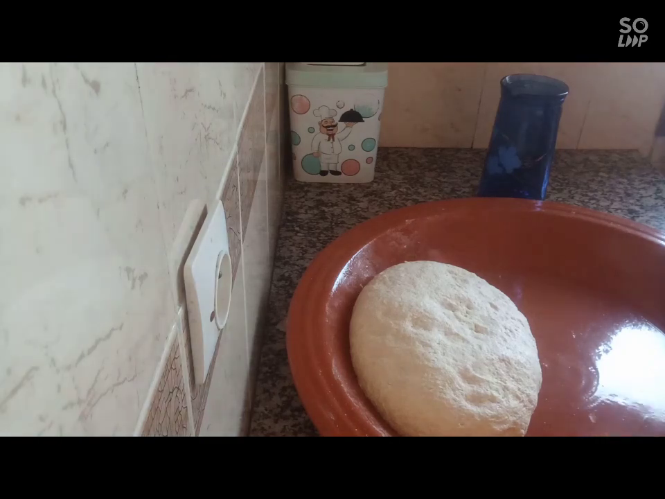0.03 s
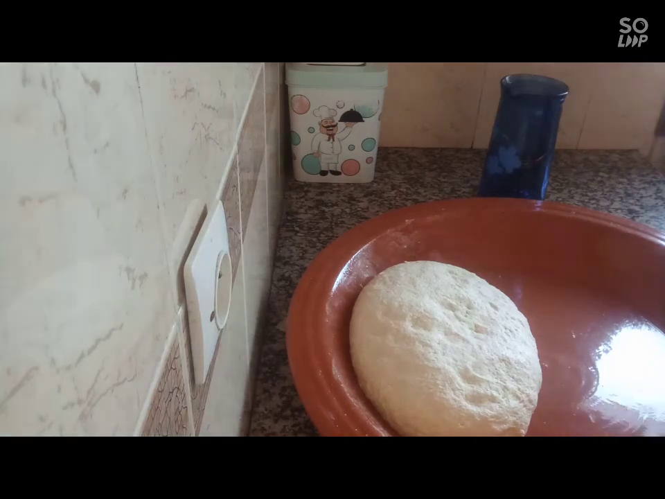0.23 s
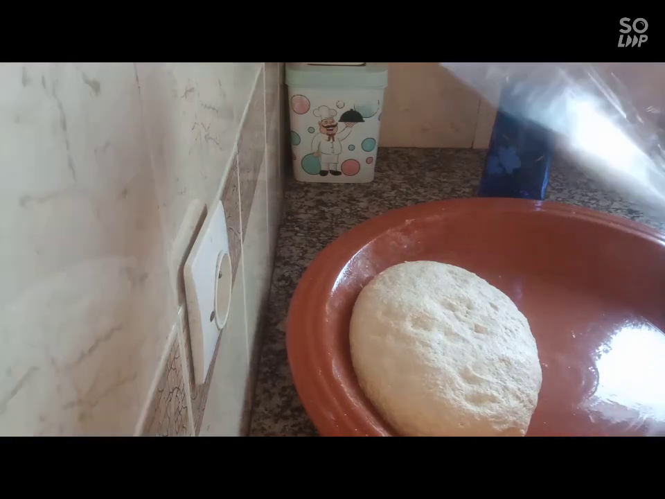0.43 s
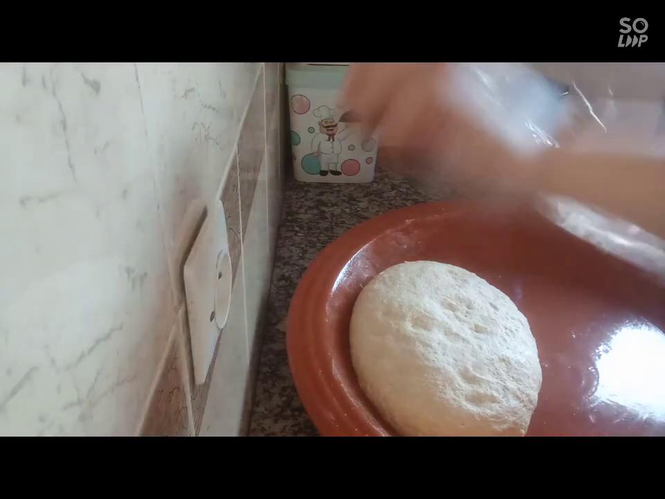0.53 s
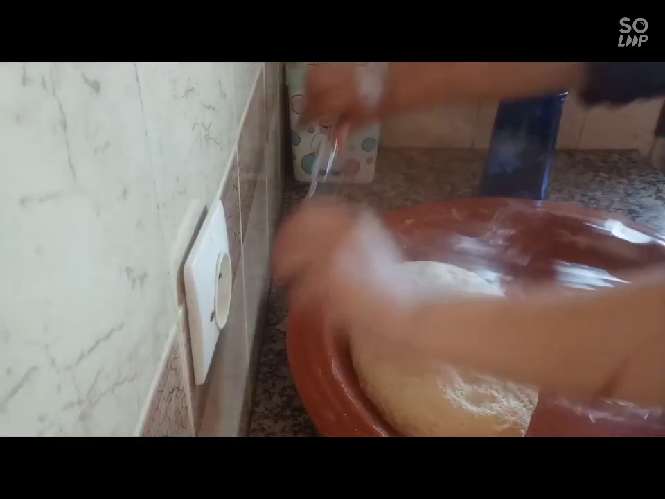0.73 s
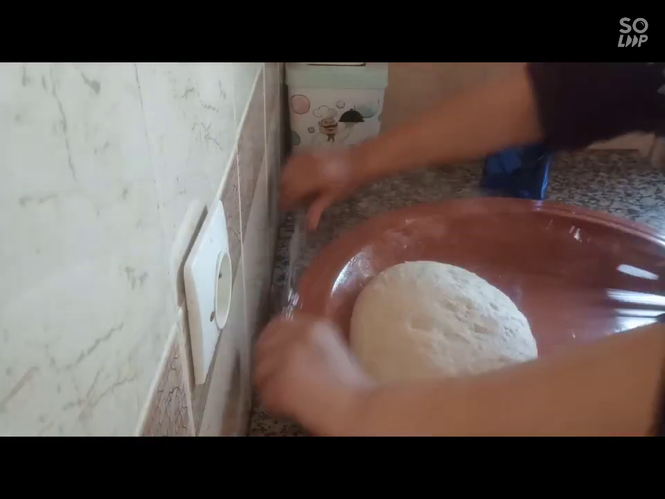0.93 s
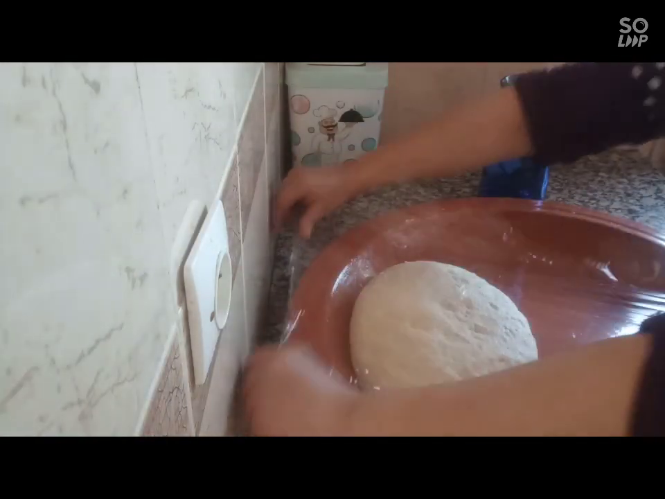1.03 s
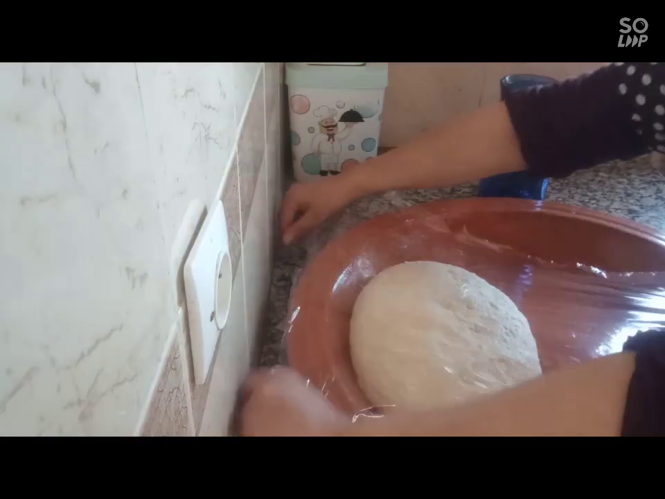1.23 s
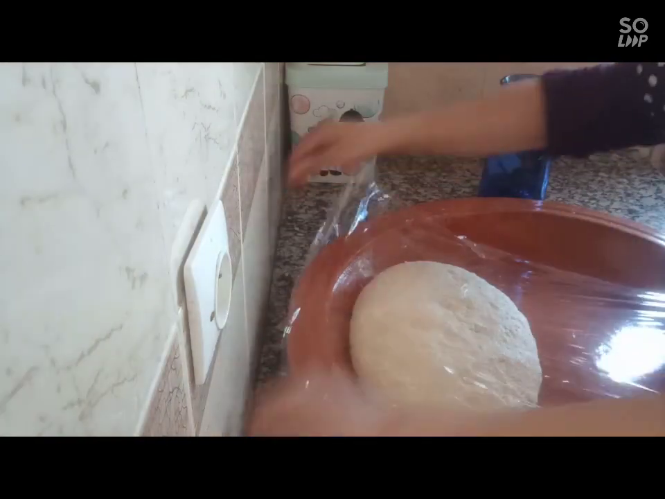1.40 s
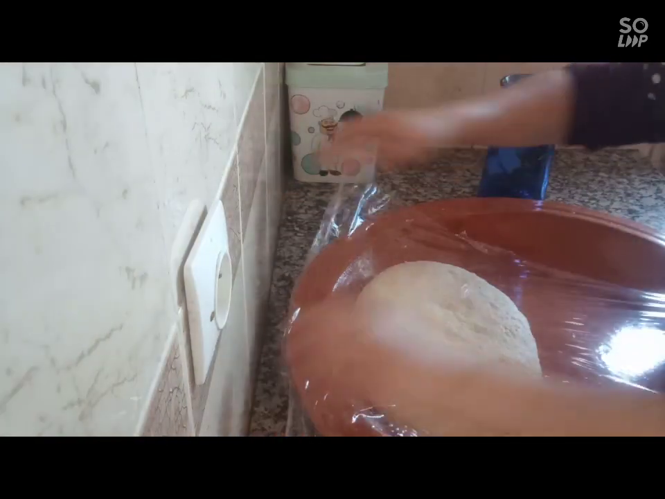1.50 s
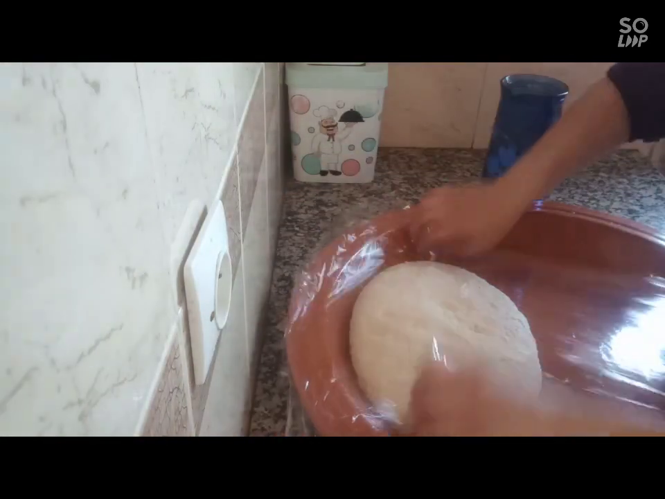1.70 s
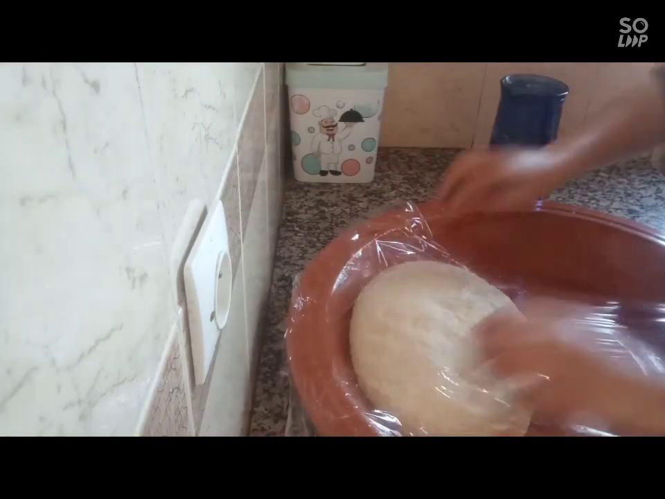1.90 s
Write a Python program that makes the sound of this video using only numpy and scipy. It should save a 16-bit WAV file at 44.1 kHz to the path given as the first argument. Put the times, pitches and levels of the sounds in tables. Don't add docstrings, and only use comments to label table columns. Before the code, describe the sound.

In a tiled home kitchen, a cabinet door rumbles and thuds, then plastic wrap is tugged, rustled and snapped over a dish, a hand knocks the clay, and another tug starts; heard nearby on a phone.

```python
import sys
import numpy as np
from scipy import signal
from scipy.fft import rfft, irfft, next_fast_len
from scipy.io import wavfile
from scipy.ndimage import map_coordinates

SR = 44100
rng = np.random.default_rng(int(sys.argv[2]) if len(sys.argv) > 2 else 0)


def unload_wav(signal):
    wavfile.write(
        sys.argv[1],
        SR,
        np.round(np.clip(np.atleast_2d(signal).T, -1, 1) * 32767).astype(np.int16),
    )


def convert_level_to_amplitude(level_db):
    exponent = np.asarray(level_db, float) / 20
    return 10 ** exponent


N = 85995
T = np.arange(N) / SR


def unit(x):
    return x / np.sqrt(np.mean(x ** 2) + 1e-20)


def along(points, hz):
    f, v = np.transpose(points)
    return np.interp(np.log(hz + 1), np.log(f + 1), v)


def level(rows):
    r = np.array(rows)
    return np.interp(T, r[:, 0], r[:, 1], left=-120, right=-120)


def filtered(x, response):
    m = next_fast_len(len(x) + SR // 4)
    spectrum = rfft(x, m) * response(np.fft.rfftfreq(m, 1 / SR))
    return irfft(spectrum, m)[:len(x)]


def grains(colour, rough_db, grain_s):
    knots = rng.standard_normal(int(N / SR / grain_s) + 4)
    lumps = convert_level_to_amplitude(rough_db * map_coordinates(knots, [T / grain_s]))
    return unit(filtered(lumps * rng.standard_normal(N), lambda hz: convert_level_to_amplitude(along(colour, hz))))


def ring(modes, t, rise_s, scatter=1):
    out = 0
    for hz, db, t60 in modes:
        decay = convert_level_to_amplitude(db + rng.normal(0, 0.22) - 60 * t / t60)
        out = out + decay * np.sin(2 * np.pi * (hz * t + scatter * rng.random()))
    return out * (1 - np.exp(-t / rise_s))


def resonances(peaks, f):
    return sum(convert_level_to_amplitude(db) * 1j * f * w / (c * c - f * f + 1j * f * w) for c, w, db in peaks)


def kitchen(x, db):
    # frequency in Hz, t60 in seconds.
    decay_times = [(100, 0.89), (500, 0.41), (2000, 0.64), (8000, 0.32), (15000, 0.38)]
    hz, t, z = signal.stft(rng.standard_normal(SR * 3 // 4), SR, nperseg=256)
    fade = convert_level_to_amplitude(-60 * t / along(decay_times, hz)[:, None])
    tail = signal.istft(z * fade, SR, nperseg=256)[1]
    delayed = np.pad(x, (int(.006 * SR), 0))
    return x + convert_level_to_amplitude(db) * signal.fftconvolve(delayed, tail / np.linalg.norm(tail))[:len(x)]


def room_hum():
    # frequency in Hz, level in dB.
    colour = [(18, -62), (30, -16), (98, -1.5), (280, -22.5), (780, -24), (2010, -35), (2230, -34),
              (7870, -50.5), (16000, -62)]
    return convert_level_to_amplitude(-51) * grains(colour, 0.21, 0.081)


def handling():
    # time in seconds, level in dB.
    bumps = [(.8, -75), (.83, -55), (.95, -64), (1.0, -43), (1.1, -57), (1.2, -66), (1.26, -54), (1.4, -70)]
    # frequency in Hz, level in dB.
    colour = [(20, -5), (40, 7), (70, -2), (130, -15), (250, -60)]
    return convert_level_to_amplitude(level(bumps)) * grains(colour, 3, .03)


def door_slide():
    # time in seconds, level in dB.
    travel = [(0, -33), (.076, -35), (.13, -39), (.18, -42.5), (.235, -44.5)]
    # frequency in Hz, level in dB.
    colour = [(35, -43), (60, -39), (87, 4), (158, -13), (220, 0.5), (292, -14), (643, -8.5), (883, -12.5),
              (4000, -31.5), (5200, -35), (8800, -120)]
    # frequency in Hz, level in dB.
    hum_lines = [(96, -36.5), (222, -55)]
    drift = np.cumsum(rng.standard_normal((len(hum_lines), N)), axis=1) * 0.026
    hum = sum(convert_level_to_amplitude(db) * np.sin(2 * np.pi * hz * T + d) for (hz, db), d in zip(hum_lines, drift))
    return convert_level_to_amplitude(level(travel)) * grains(colour, 0.67, 0.0099) + hum * (T < travel[-1][0])


def door_blows():
    # start in seconds, level in dB, low-pass in Hz, rise in seconds, room level in dB.
    shutting = [
        (0.2406, -17, 1100, 0.0016, -8),
        (0.2496, -15.5, 695, 0.00069, -5.5),
        (0.2648, -21, 605, 0.00076, -12),
    ]
    settling = [
        (.588, -32.5, 700, 0.0039, -8),
        (0.601, -37.5, 400, 0.0056, -5),
        (.621, -34.5, 254, 0.0035, -8),
    ]
    # frequency in Hz, level in dB, t60 in seconds.
    panel = [(248, 4.5, 0.047), (299, 2, 0.06), (476, 4, 0.046), (529, 4, 0.041), (626, 6, 0.037),
             (682, -0.5, 0.035), (780, -7, 0.026), (1346, -6, 0.028), (2200, -17, 0.018)]
    frame = [(201, 5.5, 0.076), (290, 4, 0.057), (412, 7, 0.041), (560, 1, 0.053), (664, -6, 0.11),
             (960, 1, .03)]
    # frequency in Hz, level in dB.
    contact = [(100, -23), (300, -4), (800, -10.5), (1500, -17.5), (3000, -19), (6000, -28), (16000, -70)]
    out = np.zeros(N)
    for blows, body in ((shutting, panel), (settling, frame)):
        for s, db, hz, rise_s, room_db in blows:
            t = np.clip(T - s, 0, None)
            crack = convert_level_to_amplitude(-2.5 - 60 * t / 0.084) * (1 - np.exp(-t / rise_s)) * grains(contact, 1, 0.0023)
            heard = kitchen(ring(body, t, rise_s, scatter=0.04) + crack, room_db)
            out += convert_level_to_amplitude(db) * filtered(heard, lambda f: 1 / (1 + 1j * f / hz))
    return out


def door_booms():
    # start in seconds, level in dB, build-up in seconds, tilt in dB per octave, phase scatter 0-1.
    booms = [
        (.245, -22, 0.016, -1, 0.89),
        (.612, -36, 0.0046, -6, 0),
    ]
    # frequency in Hz, level in dB, t60 in seconds.
    room_modes = [(98.2, 5, 0.61), (214.8, 1, 0.58), (111.5, 9, 0.15), (104, -12, .3), (262, -1, 0.17),
                  (320.5, 1.5, 0.26), (400, -4, 0.54), (458, -5.5, 0.58), (505, 6, 0.15), (704, -18, 0.17),
                  (830, -40, 0.21), (540, -13, 0.25), (642, -10, .3), (976, -24, 0.52)]
    out = np.zeros(N)
    for s, db, rise_s, tilt_db, scatter in booms:
        modes = [(hz, g + tilt_db * np.log2(hz / 100), t60) for hz, g, t60 in room_modes]
        out += convert_level_to_amplitude(db) * ring(modes, np.clip(T - s, 0, None), rise_s, scatter)
    return out


def door():
    return (door_blows() + door_booms()) * (T < .794)


def dish():
    # frequency in Hz, level in dB, t60 in seconds.
    clay = [(136.5, -4, 0.11), (221, 0, 0.19), (247, -5, 0.17), (322, -4, 0.13), (501, -11, 0.077),
            (652, -10, .06)]
    struck = ring(clay, np.clip(T - 1.566, 0, None), rise_s=0.0073)
    return convert_level_to_amplitude(-27.5) * kitchen(struck, -11.5)


def rustle():
    # time in seconds, level in dB.
    motion = [(0, -43), (.124, -49), (.298, -53.5), (.466, -60), (.6, -71), (.694, -64.5), (.792, -59.5),
              (.95, -52), (1.02, -51.5), (1.15, -61), (1.3, -67), (1.538, -74), (1.543, -55),
              (1.556, -36.5), (1.62, -49), (1.76, -58), (1.92, -76.5), (1.93, -46.5)]
    # frequency in Hz, level in dB.
    colour = [(880, -37), (1500, -13), (1780, -17), (3120, -3), (4870, -16), (7460, -1), (9950, -16),
              (14600, -12.5), (16000, -19.5)]
    return convert_level_to_amplitude(np.interp(T, *np.transpose(motion))) * grains(colour, 1.76, 0.0016)


def drag():
    # time in seconds, level in dB.
    over_dish = [(1.54, -53.5), (1.553, -49), (1.557, -35), (1.57, -38.5), (1.6, -42.5), (1.7, -55),
                 (1.9, -77)]
    tug = [(1.9245, -63), (1.926, -48.5), (1.944, -42), (1.948, -28), (1.951, -21)]
    # frequency in Hz, level in dB.
    dish_colour = [(70, -28), (130, -12), (226, -10.5), (500, -8), (1150, -9), (2550, -14.5), (5000, -26),
                   (11000, -120)]
    tug_colour = [(88, -44.5), (150, -14), (320, -17), (550, -9), (1000, -18), (1260, -12), (1670, -5.5),
                  (2300, -15), (6000, -25), (7800, -45), (13200, -120)]
    sweep = convert_level_to_amplitude(level(over_dish)) * grains(dish_colour, 1.3, 0.0039)
    return sweep + convert_level_to_amplitude(level(tug)) * grains(tug_colour, 1.1, 0.002)


def snaps():
    # start in seconds, peak in dB, length in seconds, low edge in Hz.
    folds = [(0.047, -26, 0.0063, 2200), (0.0537, -30, 0.021, 2200), (0.106, -28, 0.013, 2200),
             (0.13, -40, 0.0081, 2200), (0.183, -28.5, 0.0059, 2200), (0.221, -21, 0.0091, 1120),
             (0.237, -25, 0.014, 2200), (0.256, -25.5, 0.011, 2200), (0.3494, -41.5, 0.01, 2200),
             (0.416, -32.5, 0.014, 2200), (0.645, -49.5, 0.013, 2200), (.7861, -46, .008, 2970),
             (0.82, -41, .008, 2200), (0.934, -21, 0.0065, 2420), (.9385, -26, .006, 2430),
             (0.9877, -23.5, 0.014, 2200), (1.116, -38, 0.022, 2200), (1.129, -33, 0.013, 2200),
             (1.183, -58, 0.01, 2200), (1.249, -41.5, 0.011, 2200), (1.543, -45, 0.011, 2200),
             (1.5504, -32, 0.0068, 3000), (1.5549, -17.5, 0.0055, 2600), (1.5567, -14, 0.0034, 2630),
             (1.5596, -19.5, 0.0052, 2600), (1.571, -30, 0.0069, 2600), (1.5833, -22, 0.0086, 3000),
             (1.59, -18.5, .008, 2390), (1.593, -28, .01, 2200), (1.927, -35, 0.011, 2200),
             (1.9454, -18.5, 0.016, 2200)]
    # frequency in Hz, level in dB.
    colour = [(180, -30), (300, 0), (528, 9), (2520, -4), (4590, -13.5), (7690, -6.5), (11700, -20),
              (14000, -15), (16000, -13.5)]
    out, t = np.zeros(N), np.arange(SR // 16) / SR
    for s, db, length, low_hz in folds:
        crackle = rng.standard_normal(len(t)) * convert_level_to_amplitude(6.5 * rng.standard_normal(len(t)))
        burst = unit(filtered(crackle, lambda f: convert_level_to_amplitude(along(colour, f)) / (1 + (low_hz / (f + 1)) ** 4)))
        burst *= convert_level_to_amplitude(db - 7 - 20 * t / length) * (1 - np.exp(-t / 0.001))
        heard = kitchen(np.pad(burst, (0, SR // 2)), -5)
        rest = out[round(s * SR):][:len(heard)]
        rest += heard[:len(rest)]
    return out


def squeak():
    # time in seconds, level in dB.
    swell = [(.72, -67), (.77, -55.5), (.83, -52), (.9, -52), (.95, -62)]
    # frequency in Hz, width in Hz, level in dB.
    bands = [(1640, 240, 2.5), (2535, 330, -1), (4050, 140, 0)]
    return convert_level_to_amplitude(level(swell)) * unit(filtered(rng.standard_normal(N), lambda f: resonances(bands, f) ** 2))


def pull():
    # time in seconds, level in dB, roll resonance in Hz.
    motion = [(.68, -62.5, 1256), (.811, -51, 1250), (.816, -36, 1255), (.92, -37.5, 1103),
              (.98, -41.5, 1150), (.995, -35.5, 1160), (1.05, -35.5, 990), (1.12, -39, 1030),
              (1.19, -48, 1010), (1.225, -40.5, 1010), (1.3, -40, 840), (1.4, -49, 830),
              (1.535, -60.5, 830)]
    # frequency in Hz, level in dB.
    low_colour = [(40, -9), (200, -1), (340, -4.5), (460, -3), (820, -4), (1900, -16), (2300, -20),
                  (6000, -54)]
    high_colour = [(40, 1.5), (240, -8.5), (680, -17), (880, -9), (1300, -8), (2000, -19), (3000, -27),
                   (6500, -45)]
    # (Hz, width in Hz, dB over the colour).
    strokes = [
        (0.595, .985, [(246, 50, 4), (923, 32, 0), (1090, 110, 4.5), (1274, 45, 7), (1467, 64, 6.5), (2054, 170, 6)]),
        (.985, 1.2, [(198, 80, 4.5), (460, 83, -3), (867, 35, 6), (1215, 49, 7.5), (1394, 59, -1), (1560, 50, 0), (1690, 110, 4)]),
        (1.201, 1.6, [(228, 50, 6.5), (458, 24, 6), (797, 32, 9), (980, 76, 7), (1216, 52, 6), (1444, 31, 5), (1690, 80, 1.5)]),
    ]
    centre_hz = np.interp(T, *np.array(motion)[:, [0, 2]].T)
    high = np.clip((centre_hz - 750) / 500, 0, 1)
    slips = np.sqrt(high) * grains(high_colour, 2.3, 0.002)
    slips += np.sqrt(1 - high) * grains(low_colour, 1.5, .002)
    slips *= convert_level_to_amplitude(level(motion) - 4.5)
    out = np.zeros(N)
    for start, end, peaks in strokes:
        stroke = slips * (T >= start) * (T < end)
        out += filtered(stroke, lambda f: 1 + resonances(peaks, f))
    return out


def scene():
    background = room_hum() + handling() + door_slide() + door()
    return (background + dish() + rustle() + drag() + snaps() + squeak() + pull())[None]


def low_pass(x):
    return signal.sosfilt(signal.butter(12, 16530, fs=SR, output="sos"), x)


def record(dry):
    low = lambda hz: (1j * hz / 74 / (1 + 1j * hz / 74)) ** 3
    mix = filtered(dry[0], lambda hz: low(hz) / (1 + (hz / 15500) ** 90))[None]
    return low_pass(mix)


dry = scene()
out = record(dry)
unload_wav(out)
```